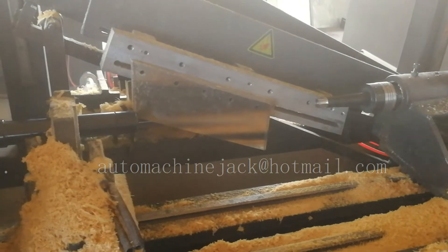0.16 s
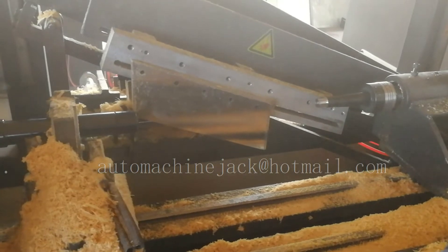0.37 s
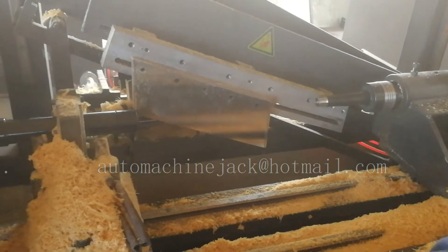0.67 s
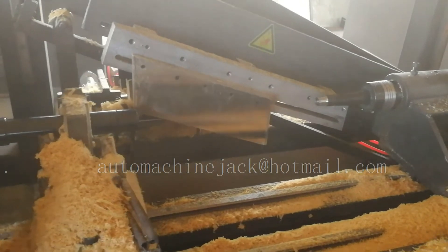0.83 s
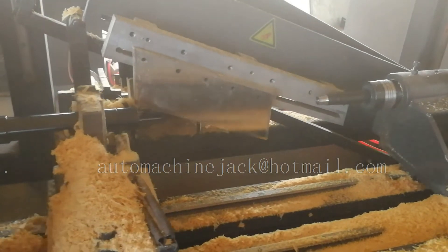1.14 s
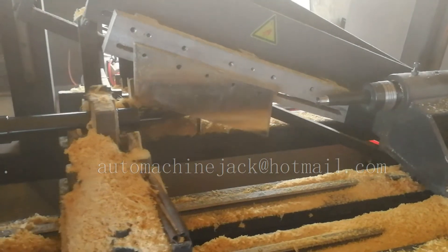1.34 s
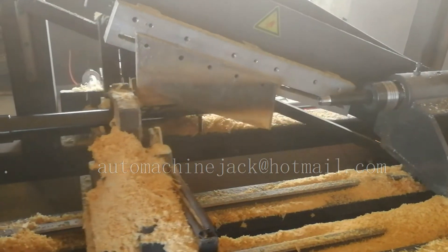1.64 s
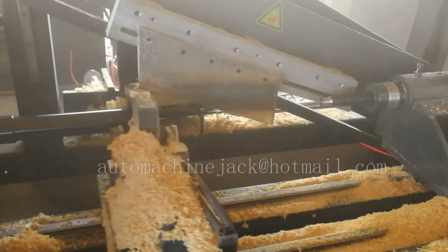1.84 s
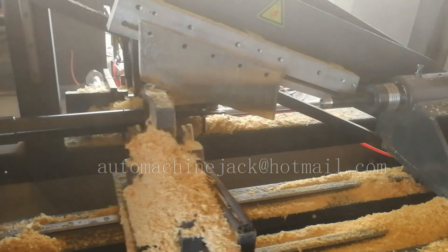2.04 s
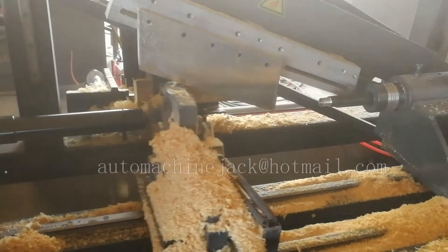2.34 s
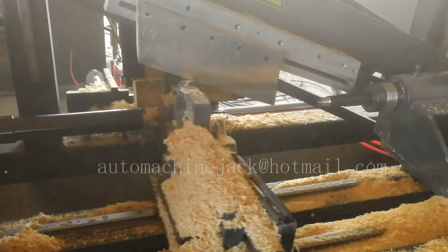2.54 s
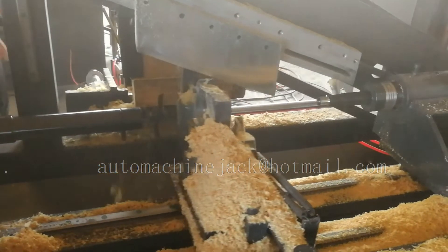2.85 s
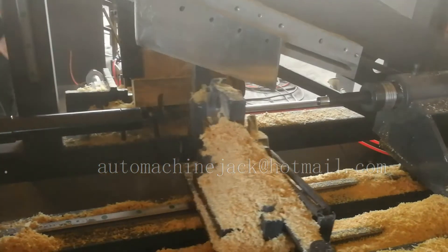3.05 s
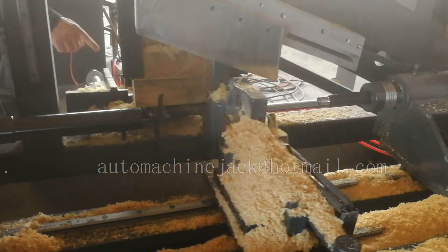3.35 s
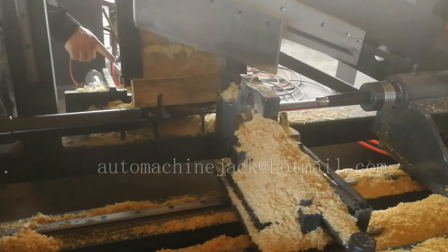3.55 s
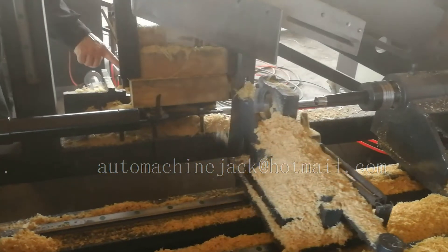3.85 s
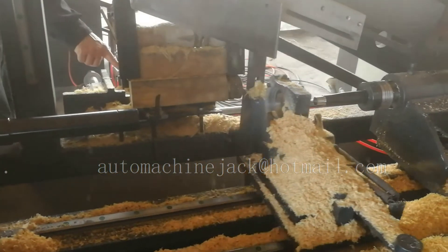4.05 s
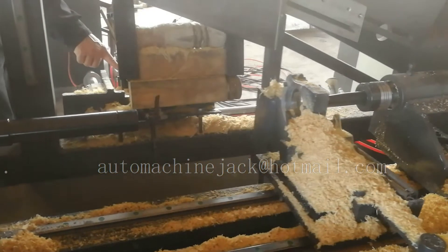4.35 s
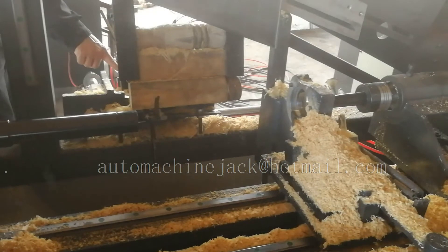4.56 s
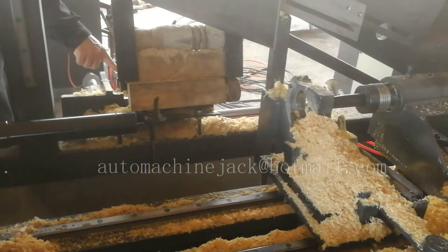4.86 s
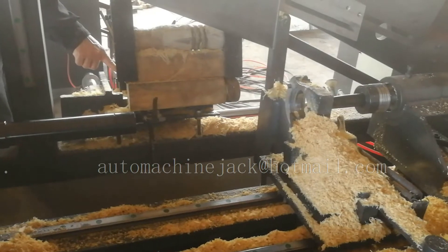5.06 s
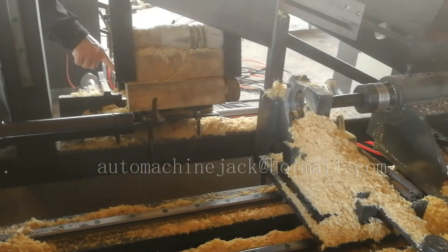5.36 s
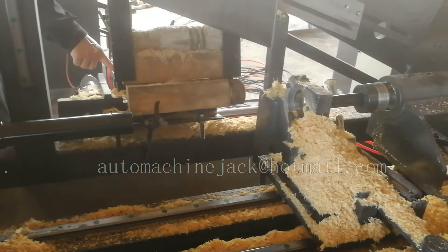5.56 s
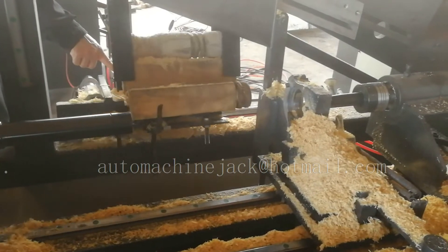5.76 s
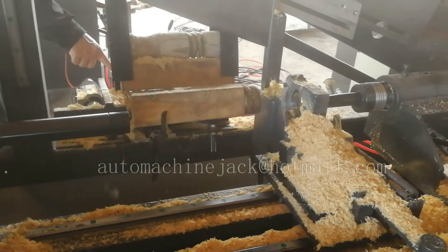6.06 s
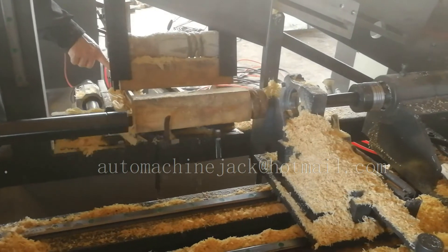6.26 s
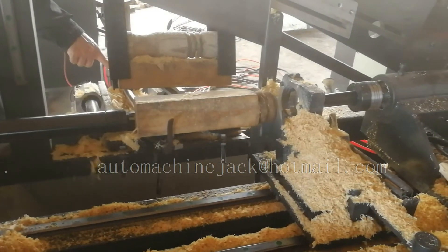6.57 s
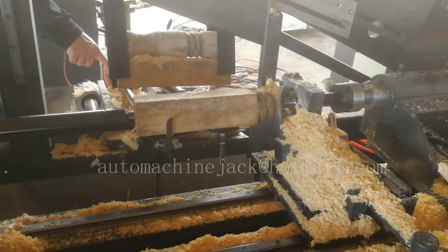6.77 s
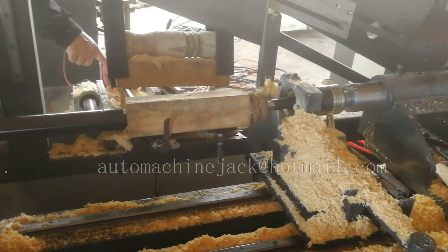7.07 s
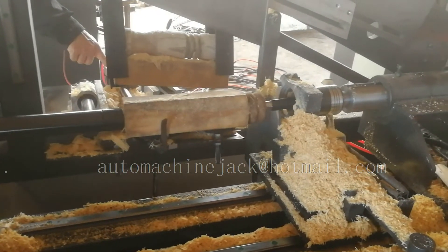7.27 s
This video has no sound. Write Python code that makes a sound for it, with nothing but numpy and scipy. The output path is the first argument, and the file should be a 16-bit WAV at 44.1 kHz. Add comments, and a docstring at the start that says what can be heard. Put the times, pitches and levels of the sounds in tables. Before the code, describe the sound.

In a factory hall, an automatic wood lathe gives a knock and a dry steel scrape. Its carriage then rolls along rails with a motor hum and fine rattle, while a wooden piece clatters down a steel chute. The carriage brakes with a low boom. Two sharp air blasts follow, with hissing, falling whistles, wooden knocks and a clamp snapping shut. The sound is close and in stereo, with short echoes.

```python
"""A knock and the dry scrape of steel come first, then a humming, rattling carriage runs back along its rails.
The scene is an automatic wood lathe in a factory hall. While the servo drives the carriage, the finished
piece clatters down a steel chute. Two air valves then dump with a sharp blast, and their cylinders hiss and
whistle downward as a new blank is fed in and clamped. Sources are filtered noise, gliding tones and struck
modes; nearby steel guards return short echoes, and the hall a weak tail, to two microphone ports."""
import sys
import numpy as np
from scipy import signal
from scipy.fft import rfft, irfft, next_fast_len
from scipy.io import wavfile
from scipy.ndimage import map_coordinates

SR = 44100
rng = np.random.default_rng(int(sys.argv[2]) if len(sys.argv) > 2 else 0)


def generate_wav(signal):
    """Clip the signal to [-1, 1] and save it as 16-bit WAV at the path in sys.argv[1]."""
    frames = np.transpose(np.atleast_2d(signal))
    scaled = np.clip(frames, -1, 1) * 32767
    pcm = np.round(scaled).astype(np.int16)
    wavfile.write(sys.argv[1], SR, pcm)


N = 326781


def amp(db):
    """Amplitude of a level in dB."""
    return 10 ** (np.asarray(db) / 20)


def unit(x):
    """x scaled to rms 1."""
    return x / np.sqrt(np.mean(x ** 2) + 1e-20)


def along(points, hz):
    """(f/Hz, value) points read off on a log frequency axis."""
    f, v = np.transpose(points)
    return np.interp(np.log(hz + 1), np.log(f + 1), v)


def curves(rows):
    """One value per sample for each column after the time."""
    s, *cols = np.transpose(rows)
    return [np.interp(np.arange(N) / SR, s, c) for c in cols]


def wobble(rate, size=N):
    """A smooth random curve, rate knots a second."""
    knots = rng.standard_normal(int(size * rate / SR) + 4)
    return map_coordinates(knots, [np.arange(size) * rate / SR])


def filtered(x, response):
    """x times a response of frequency."""
    m = next_fast_len(N + 8192)
    return irfft(rfft(x, m) * response(np.fft.rfftfreq(m, 1 / SR)), m)[..., :N]


def shape(points):
    """Response of a spectrum, falling away below its first point."""
    return lambda hz: amp(along(points, hz)) * np.minimum(hz / points[0][0], 1) ** 2


def modes(rows):
    """Response of a set of resonances (f/Hz, width/Hz, level/dB) with alternating signs."""
    def response(f):
        return sum((-1) ** k * amp(db) * 1j * f * w / (c * c - f * f + 1j * f * w)
                   for k, (c, w, db) in enumerate(rows))
    return response


# likeness of the two ports: f/Hz, left-right correlation (0-1)
PORT_LIKENESS = [(150, 0.97), (330, 0.81), (560, 0.1), (900, 0.067), (1500, 0.26), (10000, 0.04)]


def noise(response, size=N):
    """Coloured stereo noise of rms 1, near mono in the bass."""
    m = next_fast_len(size)
    hz = np.fft.rfftfreq(m, 1 / SR)
    turn = np.arccos(np.clip(along(PORT_LIKENESS, hz), -1, 1)) / 2
    spectra = rfft(rng.standard_normal((2, m))) * response(hz) * [np.cos(turn), np.sin(turn)]
    mid, side = irfft(spectra, m)[:, :size]
    return unit(np.array([mid + side, mid - side]))


def tone(hz, rough, width_hz):
    """A gliding line of rms 1; the share rough of its power is narrow noise."""
    rough = np.clip(rough, 0, 1)
    flutter = wobble(width_hz, size=len(hz)) + 1j * wobble(width_hz, size=len(hz))
    swing = np.sqrt(1 - rough) + np.sqrt(rough / 2) * flutter
    turns = np.cumsum(hz) / SR + rng.random()
    return np.sqrt(2) * np.real(swing * np.exp(2j * np.pi * turns))


def wide_tone(hz, rough, width_hz):
    """The same gliding line drawn separately for each port."""
    return np.array([tone(hz, rough, width_hz) for _ in range(2)])


def boost(hz, resonances):
    """Gain of a gliding tone as it passes through resonances (f/Hz, half width/Hz, level/dB)."""
    return amp(sum(db / (1 + ((hz - centre) / width) ** 2) for centre, width, db in resonances))


def locking(hz, resonances, broad_hz, narrow_hz, rough):
    """A breathy gliding band that grows into a clear line wherever a resonance feeds it."""
    gain = boost(hz, resonances)
    breath = np.minimum(gain, 1) * tone(hz, rough=0.97, width_hz=broad_hz)
    line = np.maximum(gain - 1, 0) * tone(hz, rough, narrow_hz)
    return breath + line


def envelope(start_s, attack_s, end_s, fade_db_per_s):
    """Rises from start_s, holds until end_s, then dies away."""
    t = np.arange(N) / SR
    return np.clip((t - start_s) / attack_s, 0, 1) * amp(-fade_db_per_s * np.maximum(t - end_s, 0))


def swell(peak_s, rise_db_per_s, fade_db_per_s):
    """Grows to 1 at peak_s, then dies away."""
    t = np.arange(N) / SR - peak_s
    return amp(-np.abs(np.where(t < 0, rise_db_per_s, fade_db_per_s) * t))


def struck(response, t60, attack_s):
    """A cluster of modes, shaped noise scaled to start near rms 1, that dies away."""
    t = np.arange(SR // 2) / SR
    fade = amp(-60 * t / t60) * (1 - np.exp(-t / attack_s))
    return unit(fade * noise(response, size=len(t))) * np.sqrt(np.mean(fade ** 2))


def add(track, s, sound):
    """Mix a sound in at time s."""
    part = track[:, round(s * SR):][:, :sound.shape[-1]]
    part += sound[..., :part.shape[1]]


def from_left(x, lag_s):
    """A source on the left reaches the right port later."""
    ports = np.array([[1], [-1]])
    return filtered(x, lambda hz: np.exp(1j * np.pi * hz * lag_s * ports))


def guards(x, echo_db, spread_s, count=24):
    """Close steel sheets send back treble copies that ripple the spectrum differently at each port."""
    out = x.copy()
    for channel, treble in enumerate(filtered(x, lambda hz: hz / (hz + 900))):
        for late, sign in zip(rng.random(count), rng.choice([-1, 1], count)):
            echo = sign * amp(echo_db) / np.sqrt(count) * treble
            add(out[channel:channel + 1], .001 + late * spread_s, echo)
    return out / np.sqrt(1 + amp(echo_db) ** 2)


# decay of the hall, where the air swallows the treble first: f/Hz, t60/s
HALL_DECAY = [(300, 1), (4500, 0.53), (7500, 0.38), (15000, 0.094)]


def hall(x):
    """A diffuse tail from the factory walls, shortest in the treble."""
    hz, t, z = signal.stft(rng.standard_normal((2, SR)), SR, nperseg=256)
    fade = amp(-60 * t / along(HALL_DECAY, hz)[:, None]) * (1 - np.exp(-t / .01))
    tail = signal.istft(z * fade, SR, nperseg=256)[1]
    return signal.fftconvolve(x, tail / np.linalg.norm(tail[0]), axes=1)[:, :N]


# the carriage's one move: it starts, reaches full speed, brakes and stands (t/s)
START_S, CRUISE_S, BRAKE_S, STOP_S = .15, 1.36, 4.39, 4.7


def motion():
    """The carriage's speed and the share of its travel done, both 0-1."""
    speed = np.interp(np.arange(N) / SR, [START_S, CRUISE_S, BRAKE_S, STOP_S], [0, 1, 1, 0])
    return speed, np.cumsum(speed) / speed.sum()


# steady rush of the hall: f/Hz, relative level/dB per Hz
HALL_RUSH = [(15, -37), (25, -19), (43, -4.5), (96, -6.5), (119, -15), (169, 3.5), (227, -29), (274, -6.5),
             (523, -20.5), (567, -19), (945, -12), (1240, -31), (6050, -25), (9050, -26), (15500, -28.5)]
# fans far off in the hall: f/Hz, width/Hz, relative level/dB
FAR_FANS = [(926, 41, 3), (1327, 50, 13)]


def factory():
    """Far behind the machine, noise forms the hall's gently drifting rush, with resonant distant fans."""
    fans = amp(-70) * noise(modes(FAR_FANS))
    drift = amp(.6 * wobble(5))
    return amp(-54) * drift * noise(shape(HALL_RUSH)) + fans


# spectrum of the heavy frame: f/Hz, relative level/dB per Hz
FRAME_RUMBLE = [(25, -25), (55, -16), (95, -5.5), (150, -2), (220, 1), (300, -6), (450, -9), (900, -75)]
# stops and blows that shake the frame: t/s, level/dB before the trims below, fade/dB per s
FRAME_JOLTS = [(.003, -39, 50), (2.78, -46, 16), (4.53, -39, 49), (5.5, -43.5, 98), (5.78, -37.5, 123),
               (6.61, -37.5, 76)]
RUMBLE_DB, PUMP_DB = -46, -53.5  # the frame under travel; the oil pump under the feed and clamp strokes


def frame():
    """The heavy frame rumbles with the travel; jolts and the pump ring its low resonance."""
    speed, _ = motion()
    jolt = np.sqrt(sum((amp(db) * swell(s, rise_db_per_s=330, fade_db_per_s=fade)) ** 2
                       for s, db, fade in FRAME_JOLTS))
    force = np.hypot(amp(RUMBLE_DB) * speed ** 0.74, amp(-5) * jolt)
    rumble = force * amp(1.55 * wobble(16)) * noise(shape(FRAME_RUMBLE))
    pump = amp(PUMP_DB) * envelope(5.27, attack_s=0.072, end_s=7.11, fade_db_per_s=20)
    resonance = noise(lambda hz: np.abs(modes([(190, 140, 0)])(hz)) ** 4)
    return rumble + np.hypot(pump, amp(-2.5) * jolt) * resonance


CARRIER_HZ = 10000  # switching rate
CURRENT_HZ = 72.8  # motor current at full speed


def inverter():
    """The switching whine splits into sidebands that fan out with motor speed, fading before full speed."""
    speed, _ = motion()
    sides = sum(tone(CARRIER_HZ + k * CURRENT_HZ * speed, rough=.7, width_hz=30) for k in (-5, -1, 1, 5))
    carrier = tone(np.full(N, CARRIER_HZ), rough=0.52, width_hz=57)
    octave_below = tone(np.full(N, CARRIER_HZ / 2), rough=0.79, width_hz=260)
    pull = envelope(START_S, attack_s=0.48, end_s=1.0, fade_db_per_s=32)
    return pull * (amp(-56.5) * carrier + amp(-60.5) * octave_below + amp(-57.5) * sides)


# course of the servo hum, before its two orders are weighted and summed: t/s, level/dB
SERVO_HUM = [(0, -35), (.1, -45), (.45, -59.5), (2.6, -53), (2.85, -50.5), (3.7, -42.5), (3.97, -35),
             (4.17, -34), (4.31, -44.5), (4.85, -55), (5.2, -88)]
# harmonics of the frame's boom under braking: multiple, relative level/dB
BRAKE_HARMONICS = [(1, 0.5), (2, -21), (3, -24.5)]
SHAFT_HZ, SHAFT_SAG_HZ = 91.26, 6  # servo shaft rate, and how far it has sunk at the end of the travel
SCREW_HZ, SCREW_RISE_HZ, SCREW_DB = 183.8, 199, -43.5  # drive screw: first pitch, rise over all the travel
BOOM_HZ, PULL_DB, BRAKE_DB = 199, -42.5, -29.5  # frame boom while speeding up and while braking


def servo():
    """Shaft orders hum, the lowest only late; the screw drones upward and speed changes boom the frame."""
    _, travel = motion()
    shaft_hz = SHAFT_HZ - SHAFT_SAG_HZ * travel ** 2
    orders = sum(amp(db) * tone(k * shaft_hz, rough=0.19, width_hz=22) for k, db in [(2, -.3), (3, -1.8)])
    hum = amp(curves(SERVO_HUM)[0]) * orders

    low_level = amp(-43.5) * envelope(2.6, attack_s=0.36, end_s=3.05, fade_db_per_s=15.5)
    low_hum = low_level * tone(shaft_hz, rough=0.77, width_hz=22)

    screw_level = amp(SCREW_DB + 2.6 * wobble(8.87))
    screw_level = screw_level * envelope(1.35, attack_s=0.17, end_s=2.72, fade_db_per_s=44)
    screw = screw_level * tone(SCREW_HZ + SCREW_RISE_HZ * travel, rough=0.92, width_hz=35)

    boom = sum(amp(db) * tone(np.full(N, k * BOOM_HZ), rough=0.08, width_hz=28.5)
               for k, db in BRAKE_HARMONICS)
    brake = amp(BRAKE_DB) * envelope(4.35, attack_s=0.11, end_s=4.47, fade_db_per_s=64) * boom

    strain = tone(np.full(N, BOOM_HZ), rough=0.75, width_hz=42)
    strain = strain + amp(-4) * tone(3 * shaft_hz, rough=0.44, width_hz=36)
    pull = amp(PULL_DB) * envelope(0.49, attack_s=0.35, end_s=1.26, fade_db_per_s=174) * strain
    return hum + low_hum + screw + pull + brake


# knocks of wood and slides: t/s, level/dB, centre f/Hz, width/Hz (before sharpening), t60/s
WOOD_KNOCKS = [(.003, -34, 188, 232, .29), (0.0845, -25, 1320, 890, 0.027),
               (0.0995, -10, 840, 1400, 0.0079), (.102, -38, 684, 1000, 0.21),
               (1.234, -32.5, 205, 120, 0.12), (1.373, -32, 630, 800, .061), (2.707, -27.5, 5940, 7000, .1),
               (2.746, -33, 187, 210, 0.38), (2.757, -30, 860, 600, 0.087), (2.802, -34, 1150, 900, 0.042),
               (5.279, -28.5, 180, 378, 0.077), (5.717, -36, 656, 900, .08),
               (5.7275, -14.5, 1030, 900, 0.022), (5.729, -35, 270, 300, .12),
               (5.736, -31.5, 895, 900, 0.24), (6.524, -30.5, 910, 550, 0.18), (6.531, -36, 375, 450, .15),
               (6.547, -25.5, 950, 350, 0.084), (6.552, -24.5, 202, 330, 0.067), (6.6, -46, 382, 490, 1)]


def knocks():
    """Each blow rings a dense, well damped cluster of modes."""
    out = np.zeros((2, N))
    for s, db, centre_hz, width_hz, t60 in WOOD_KNOCKS:
        cluster = lambda hz: np.abs(modes([(centre_hz, width_hz, 0)])(hz)) ** 4
        add(out, s, amp(db) * struck(cluster, t60, attack_s=0.00068))
    return out


# steel ticks: t/s, level/dB
STEEL_TICKS = [(0.0988, -21.5), (1.304, -28), (1.367, -28), (1.578, -27.5), (1.704, -25), (1.896, -36)]


def ticks():
    """Steel ticks close to the microphone: short, high and dry."""
    out = np.zeros((2, N))
    for s, db in STEEL_TICKS:
        add(out, s, amp(db) * struck(lambda hz: modes([(7900, 1700, 0)])(hz) ** 2, t60=.012, attack_s=.0002))
    return out


# sliding steel: t/s, length/s, first f/Hz, last f/Hz, level/dB, roughness (0-1)
STEEL_SQUEALS = [(0.095, 0.041, 1680, 1620, -35.5, 0.93), (0.12, 0.3, 2000, 1900, -50, 0.7),
                 (0.277, 0.21, 1546, 1244, -46.5, 0.8), (0.356, 0.047, 3030, 2910, -50, 0.4),
                 (0.584, 0.162, 1650, 1485, -43.5, 0.93), (2.602, 0.032, 4900, 4880, -34, 0.4),
                 (2.664, 0.045, 1523, 1500, -32, 0.1)]


def squeals():
    """Short stick-slip tones that swell, sink a little and stop."""
    t, out = np.arange(SR // 2) / SR, np.zeros((2, N))
    for s, length, first_hz, last_hz, db, rough in STEEL_SQUEALS:
        done = np.clip(t / length, 0, 1)
        hz = first_hz + (last_hz - first_hz) * done
        arch = np.sqrt(4 * done * (1 - done))
        add(out, s, amp(db) * arch * wide_tone(hz, rough, width_hz=150))
    return out


# resonances of the tailstock quill: f/Hz, width/Hz (before sharpening), relative level/dB
QUILL_RING = [(545, 100, -22), (1010, 210, -0.5), (1410, 350, 1.5), (1570, 280, -1), (1896, 68, -6),
              (2990, 350, -7.5), (3750, 250, -13.5)]
# strokes of the dry quill: t/s of the peak, level/dB, rise/dB per s
QUILL_STROKES = [(.01, -46.5, 520), (.105, -37.5, 518), (.63, -43, 130), (7.322, -50, 500),
                 (7.39, -41.5, 192)]


def quill():
    """Dry steel chatters through a few broad, steep-sided resonances."""
    force = np.max([amp(db) * swell(s, rise, fade_db_per_s=25) for s, db, rise in QUILL_STROKES], axis=0)
    ring = lambda hz: sum(amp(db) * np.abs(modes([(centre, 1.9 * width, 0)])(hz)) ** 4
                          for centre, width, db in QUILL_RING)
    chatter = amp(0.89 * wobble(110) + 0.4 * wobble(15.5))
    return force * unit(chatter * noise(ring))


# bounces of the finished piece: t/s, level/dB before the wood and chute trims
BOUNCES = [(2.708, -25), (2.719, -25.5), (2.729, -30), (2.741, -26), (2.749, -30), (2.761, -39),
           (2.802, -32.5)]
# ring of the wooden piece: f/Hz, width/Hz, relative level/dB
WOOD_RING = [(597, 140, -3.5), (1140, 230, 3), (1720, 180, 1), (2230, 460, 0), (2880, 270, -1),
             (3440, 230, 0), (4300, 480, -3.5), (5050, 330, 0)]
# ring of the steel chute: f/Hz, mean relative level/dB, t60/s
CHUTE_RING = [(1145, -10, 0.36), (2206, 1, .1), (2406, -5.5, 0.14), (2660, 0, 0.1), (3338, -7, 0.41),
              (3940, -8, .2), (5400, -2, .13)]
CHUTE_DB = -32.5  # trim of the chute at the hardest bounce


def drop():
    """The finished piece clatters down; each bounce chatters and rings the chute's modes in a new mix."""
    out, t = np.zeros((2, N)), np.arange(SR // 2) / SR
    hardest = max(db for _, db in BOUNCES)
    for s, db in BOUNCES:
        chatter = amp(1.9 * wobble(585, size=len(t)))
        wood = amp(db + 1) * chatter * struck(modes(WOOD_RING), t60=0.13, attack_s=.0012)
        ring = np.zeros((2, len(t)))
        for hz, level, t60 in CHUTE_RING:
            fade = amp(level + rng.normal(0, 3.9) - 60 * t / t60)
            ring += fade * np.sin(2 * np.pi * (hz * t + rng.random((2, 1))))
        add(out, s, wood + amp(CHUTE_DB + db - hardest) * ring)
    return out


# bed resonances, shifted by the carriage's weight: first f/Hz, last f/Hz, width/Hz, level/dB
BED_GLIDES = [(944, 790, 230, -45), (1341, 1680, 260, -45.5), (1793, 1130, 260, -54),
              (3140, 2900, 380, -53)]
BED_CORE_DB, BED_CORE_WIDTH_HZ = -5, 70  # sharp centre of each, against its skirt


def bed(travel):
    """Lathe bed resonances, sharp cores in broad skirts, glide past each other as the carriage moves."""
    glides = [(first + (last - first) * travel, width, db) for first, last, width, db in BED_GLIDES]
    skirts = sum(amp(db) * wide_tone(hz, rough=1, width_hz=width) for hz, width, db in glides)
    cores = sum(amp(db + BED_CORE_DB) * tone(hz, rough=1, width_hz=BED_CORE_WIDTH_HZ) for hz, _, db in glides)
    return (skirts + cores) / np.hypot(1, amp(BED_CORE_DB))


# rolling on the rails: f/Hz, relative level/dB per Hz
RAIL_ROLL = [(370, -4), (600, -2.5), (1000, -0.5), (1500, 1.5), (2000, -6), (2700, -6), (3800, -6),
             (5000, -6), (5900, -12), (8500, -16), (9100, -18.5), (10200, -11.5), (10900, -15),
             (15500, -20)]
# resonances of the machine's panels: f/Hz, width/Hz, relative level/dB before squaring
PANEL_RING = [(2660, 65, 0), (3360, 47, -3), (4290, 140, -3), (4850, 240, -4), (6360, 190, -6)]
# ticking of balls and chips: f/Hz, relative level/dB per Hz
BALL_RATTLE = [(2500, -69), (5000, 2), (6200, 12), (8300, 17.5), (9300, 9), (11000, 2), (15500, 2.5)]
# where the rail wave swells and narrows: f/Hz, half width/Hz, boost/dB
RAIL_RESONANCES = [(880, 36, 9), (395, 34, 10.5), (288, 45, 4.5), (1196, 72, 11.5), (1450, 60, 11)]
# harmonics of the rail wave: multiple of the first f, relative level/dB
RAIL_HARMONICS = [(1, 1.5), (2, -13.5), (3, -6), (5, -13)]
# level at full speed, power of the speed, gain over the whole travel
ROLL_DB, ROLL_POWER, ROLL_NEARER_DB = -33.5, 1.53, 1.5
RATTLE_DB, RATTLE_POWER, RATTLE_NEARER_DB = -41.5, 2, 4
PANELS_DB, BED_POWER = -49, 5.2  # the bed rings only near full speed
CREEP_SPURTS_DB = 4.5  # at low speed the rattle comes in spurts
# standing wave in the rail, whose free length grows with the travel; shorter waves hardly ring
RAIL_START_HZ, RAIL_END_HZ, RAIL_DB, RAIL_DAMPED_HZ = 3597, 240.9, -45, 950


def carriage():
    """Bearings roll and ring the bed, balls and chips tick, and rough standing waves sink with the travel."""
    speed, travel = motion()
    rolling = speed ** ROLL_POWER
    grain = unit(amp(1.05 * wobble(25.18) + 1.0 * wobble(260)))
    panels = amp(PANELS_DB) * noise(lambda hz: np.abs(modes(PANEL_RING)(hz)) ** 2)
    slide = amp(ROLL_DB + ROLL_NEARER_DB * travel) * noise(shape(RAIL_ROLL)) + panels
    roll = grain * (rolling * slide + speed ** BED_POWER * bed(travel))
    roll = roll - (1 - speed) * filtered(roll, lambda hz: hz / (hz + 5000))  # duller when slow

    ticking = unit(amp(3.2 * wobble(420) + 1.5 * wobble(90)) * noise(shape(BALL_RATTLE)))
    spurts_db = CREEP_SPURTS_DB * np.sqrt(1 - speed) * wobble(40)
    rattle = speed ** RATTLE_POWER * amp(RATTLE_DB + RATTLE_NEARER_DB * travel + spurts_db) * ticking

    rail_hz = 1 / ((1 - travel) / RAIL_START_HZ + travel / RAIL_END_HZ)
    waves = sum(amp(db) * locking(k * rail_hz, RAIL_RESONANCES, broad_hz=125, narrow_hz=50, rough=.5)
                for k, db in RAIL_HARMONICS)
    skirt = amp(-0.5) * wide_tone(rail_hz, rough=1, width_hz=370)
    rail = amp(RAIL_DB) * (waves + skirt) / (1 + (rail_hz / RAIL_DAMPED_HZ) ** 4)
    return from_left(roll + rattle, lag_s=0.000658) + rolling * rail


# closing and rebounds of the clamp: t/s, level/dB
CLAMP_CONTACTS = [(6.5548, -12.5), (6.558, -12), (6.563, -13.5)]
# ring of the clamp: f/Hz, level/dB against the contact, t60/s
CLAMP_RING = [(5200, -2, 0.04), (5530, 3.5, 0.041), (5670, -18.5, 0.64), (8020, -23.5, 0.36),
              (8830, -23, 0.084)]
CRACK_DB = -3.5  # the contact itself, against the ring


def clamp():
    """The steel clamp closes and rebounds, with a crack and a brief ring at each contact."""
    out = np.zeros((2, N))
    for s, db in CLAMP_CONTACTS:
        add(out, s, amp(db + CRACK_DB) * struck(modes([(7450, 6200, 0)]), t60=0.014, attack_s=.0001))
        for hz, level, t60 in CLAMP_RING:
            mode = lambda f: modes([(hz, 150, 0)])(f) ** 2
            add(out, s, amp(db + level) * struck(mode, t60, attack_s=0.00036))
    return out


# air cylinders venting: start t/s, end t/s, first level/dB, settled level/dB
VENTS = [(5.271, 6.564, -26.5, -28.5), (5.506, 5.954, -27, -36), (6.56, 7.119, -34, -38)]
# pressure time constant, opening time, fade at the end of a stroke
SETTLE_S, OPEN_S, SHUT_DB_PER_S = 0.57, 0.011, 200


def stroke(start, end, first_db, settled_db):
    """A cylinder's air flow, and its excess pressure settling from 1 towards 0."""
    excess = np.exp(-np.maximum(np.arange(N) / SR - start, 0) / SETTLE_S)
    flow = amp(settled_db + (first_db - settled_db) * excess) * envelope(start, OPEN_S, end, SHUT_DB_PER_S)
    return flow, excess


# narrow outlet of the clamp cylinder: f/Hz, relative level/dB per Hz
CLAMP_OUTLET = [(1500, -13), (1950, 11), (2400, -12), (3700, 10.5), (4500, -20), (7500, -8), (9500, -23),
                (11500, -5), (13000, -6), (15500, -6)]
# air seeping past the shut valve: f/Hz, width/Hz, relative level/dB before squaring
VALVE_LEAK = [(3640, 320, 6), (4650, 800, 7)]
CLAMP_AIR_DB, LEAK_DB = -41.5, -43


def clamp_air():
    """The clamp cylinder's outlet adds a bright hiss; once its valve shuts, the last air seeps away."""
    start, end, *_ = VENTS[-1]
    jet = amp(CLAMP_AIR_DB) * envelope(start, OPEN_S, end, SHUT_DB_PER_S) * noise(shape(CLAMP_OUTLET))
    leak = amp(LEAK_DB) * envelope(end, attack_s=.04, end_s=7.1, fade_db_per_s=60)
    return jet + leak * noise(lambda hz: np.abs(modes(VALVE_LEAK)(hz)) ** 2)


# each vent's whistle: first f/Hz, settled f/Hz, settling time/s, level/dB over the air flow
VENT_WHISTLES = [(1945, 1655, .36, -22.5), (1890, 1690, .28, -25), (2170, 1215, .24, -15)]
# cavities that feed or swallow the falling whistle: f/Hz, half width/Hz, boost/dB
WHISTLE_CAVITIES = [(1825, 65, 10.5), (1950, 60, 6.5), (1690, 35, 3), (1565, 75, -13), (1378, 45, 15)]


def whistles():
    """Each venting cylinder whistles, falling with its pressure, purer as it passes a feeding cavity."""
    out, t = np.zeros((2, N)), np.arange(N) / SR
    for vent, (first_hz, settled_hz, settle_s, whistle_db) in zip(VENTS, VENT_WHISTLES):
        start, end, *_ = vent
        flow, _ = stroke(*vent)
        hz = settled_hz + (first_hz - settled_hz) * np.exp(-np.maximum(t - start, 0) / settle_s)
        line = locking(hz, WHISTLE_CAVITIES, broad_hz=80, narrow_hz=45, rough=.12)
        skirt = boost(hz, WHISTLE_CAVITIES) * wide_tone(hz, rough=0.94, width_hz=240)
        level = flow * amp(whistle_db) * envelope(start, attack_s=.06, end_s=end - .05, fade_db_per_s=60)
        out += level * (line + amp(-7) * skirt)
    return out


# hiss through the silencer, which passes mostly treble: f/Hz, relative level/dB per Hz
SILENCER_HISS = [(560, -30), (720, -18), (980, -9.5), (1300, -8), (1800, -7.5), (3300, -8.5), (4100, 0.5),
                 (4700, 2), (5800, -5), (7000, -2), (7500, -7), (8100, -12.5), (9600, -10), (10600, -14.5),
                 (11500, -17.5), (12200, -14.5), (15500, -25)]
# resonances of the exhaust housing: f/Hz, relative level/dB
HOUSING_RING = [(4039, -45), (4161, -38.5), (4375, -44), (4582, -51), (4688, -43), (4888, -50), (5046, -38),
                (5184, -51), (5555, -38), (6289, -43), (7034, -39), (8979, -53), (9492, -50), (9589, -44)]
# cavity resonances of the silencer: f/Hz, width/Hz, relative level/dB before squaring
SILENCER_CAVITIES = [(952, 47, 4.5), (1677, 38, 6), (1865, 160, 4), (2615, 220, 3.5)]
# flow at which the hiss keeps its plain colour; stronger flow is brighter, weaker flow duller
EVEN_FLOW_DB, FIZZ_POWER = -33, 0.35


def exhaust():
    """Air leaves through the silencer and rings its housing; hiss and piston rub sink as pressure settles."""
    strokes = [stroke(*vent) for vent in VENTS]
    total = np.sqrt(sum(flow ** 2 for flow, _ in strokes))
    rubbing = sum(flow * excess for flow, excess in strokes)
    housing = lambda hz: sum(amp(db) * np.abs(modes([(centre, 26, 0)])(hz)) ** 2
                             for centre, db in HOUSING_RING)
    cavity = lambda hz: np.abs(modes(SILENCER_CAVITIES)(hz)) ** 2
    hiss = guards(noise(shape(SILENCER_HISS)), echo_db=0.5, spread_s=0.023, count=48)
    hiss = hiss + amp(-6.5) * noise(housing) + amp(-13.5) * noise(cavity)
    fizz = filtered(hiss, lambda hz: np.clip((hz - 7500) / 2000, 0, 1))
    hiss = hiss + fizz * ((total / amp(EVEN_FLOW_DB)) ** FIZZ_POWER - 1)
    rub = amp(-28.5) * rubbing * noise(lambda hz: np.abs(modes([(280, 190, 0)])(hz)) ** 4)
    return total * amp(0.34 * wobble(24)) * hiss + rub


# valve dumps: t/s, level/dB, hold/s, t60/s
VALVE_DUMPS = [(5.285, -12, 0.01, 0.18), (6.56, -15, 0.0054, 0.2)]
# one list for each valve's outlet: f/Hz, relative level/dB per Hz
VALVE_OUTLETS = [
    [(200, -11), (600, -60), (1500, -45), (3000, -14), (4000, -6), (5700, -1.5), (7500, -10.5), (9300, -11),
     (10800, -14.5), (12500, -17.5), (15500, -23)],
    [(200, -29), (600, -24.5), (1500, -24), (3000, -21), (4100, -4.5), (5000, -9), (5550, -15), (6200, -8),
     (7300, -14), (8100, -13), (9500, -26), (11000, -20), (15500, -31)],
]


def valves():
    """A valve opens within milliseconds, blows at full pressure for a moment, then empties."""
    out, t = np.zeros((2, N)), np.arange(SR // 2) / SR
    for (s, db, hold, t60), outlet in zip(VALVE_DUMPS, VALVE_OUTLETS):
        pressure = amp(db - 60 * np.maximum(t - hold, 0) / t60) * (1 - np.exp(-t / 0.00046))
        sputter = amp(1.4 * wobble(400, size=len(t)))
        add(out, s, pressure * sputter * noise(shape(outlet), size=len(t)))
    return out


def scene():
    """The machine's parts among its guards, over the factory background."""
    travel = guards(carriage() + quill(), echo_db=-1.5, spread_s=.012)
    blast = guards(valves(), echo_db=-4, spread_s=.012)
    air = from_left(exhaust() + clamp_air() + blast, lag_s=0.000662)
    air = air * amp([[-.8], [.8]])  # slightly louder at the right port
    machine = travel + air + whistles() + squeals() + knocks() + drop() + clamp()
    echo = amp(-16) * hall(machine)
    return machine + echo + ticks() + frame() + servo() + inverter() + factory()


# colour of the left microphone port: f/Hz, gain/dB
LEFT_MICROPHONE = [(170, -0.1), (600, 4), (1300, 2), (2500, 5), (3700, 1), (4400, -0.5), (5600, -2.5),
                   (6700, 2), (7700, 8), (8600, 15.5), (9200, 10.5), (9900, 7.5), (10700, 2.5), (15500, 1)]
TOP_HZ = 15950  # band limit


def record(dry):
    """The left port has its own resonance; high peaks are rounded off and the top band is cut."""
    x = filtered(dry, lambda hz: np.array([amp(along(LEFT_MICROPHONE, hz)), np.ones_like(hz)]))
    x = x / (1 + np.abs(x / .92) ** 8) ** (1 / 8)
    return filtered(x, lambda hz: hz < TOP_HZ)


dry = scene()
out = record(dry)
generate_wav(out)
```